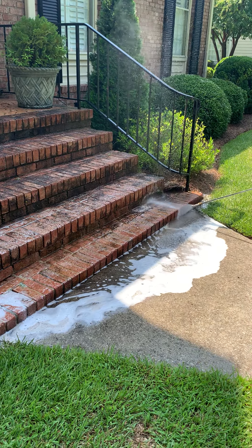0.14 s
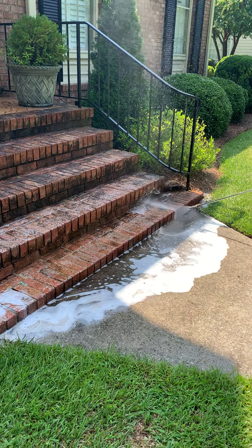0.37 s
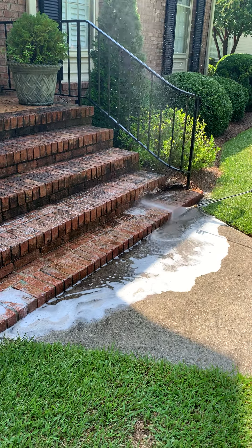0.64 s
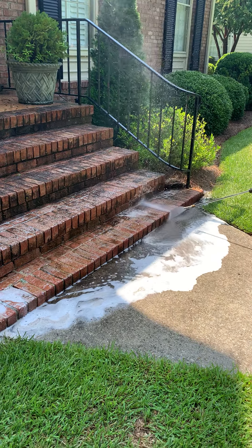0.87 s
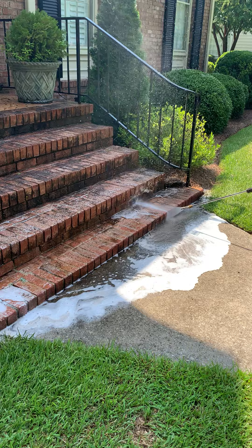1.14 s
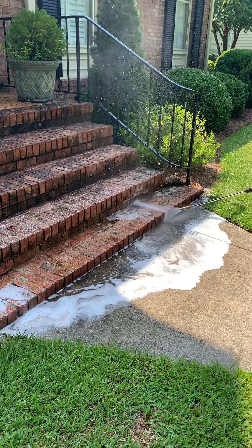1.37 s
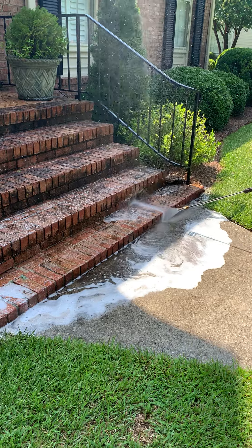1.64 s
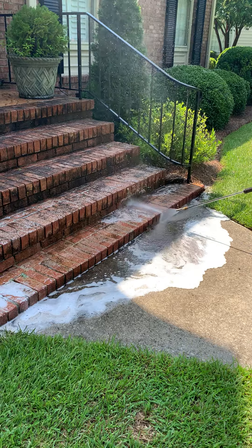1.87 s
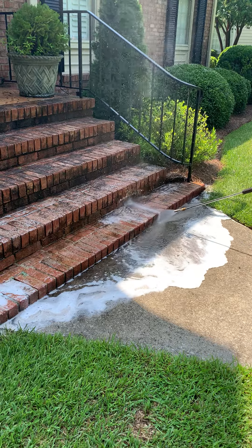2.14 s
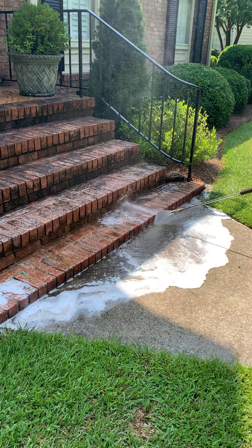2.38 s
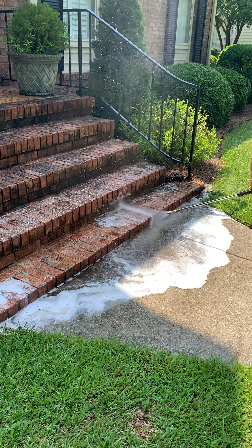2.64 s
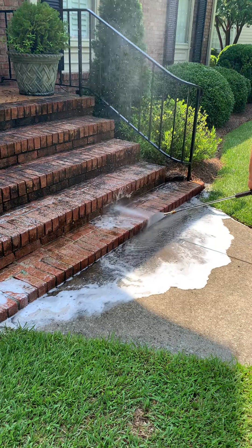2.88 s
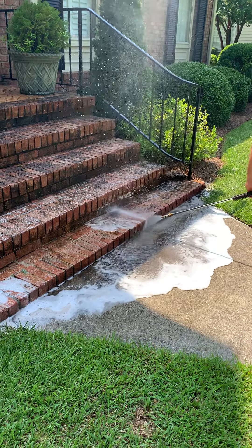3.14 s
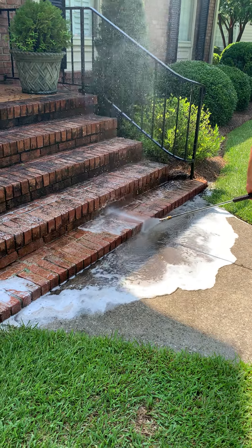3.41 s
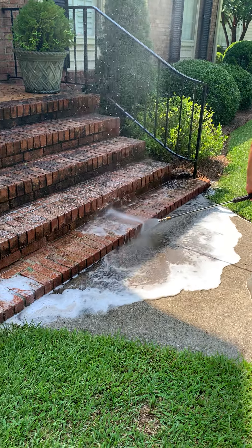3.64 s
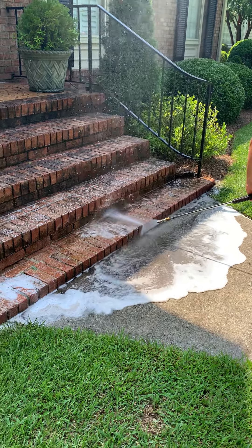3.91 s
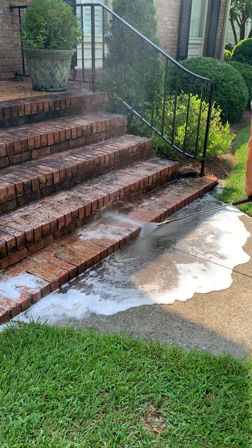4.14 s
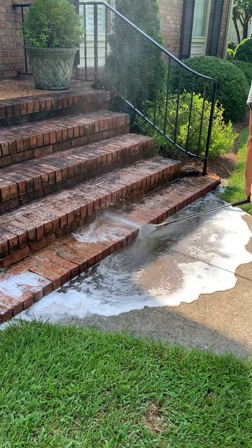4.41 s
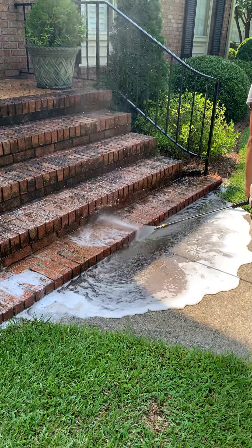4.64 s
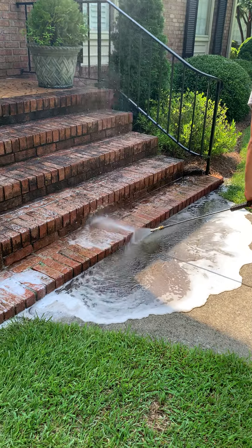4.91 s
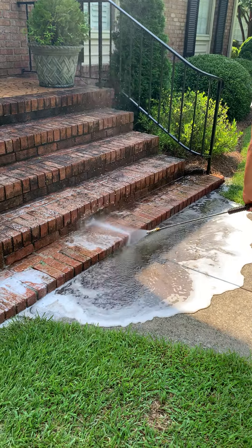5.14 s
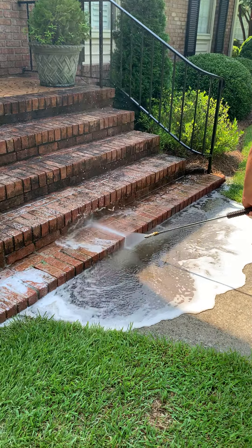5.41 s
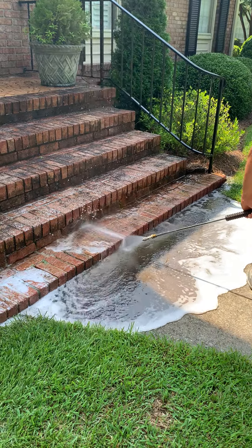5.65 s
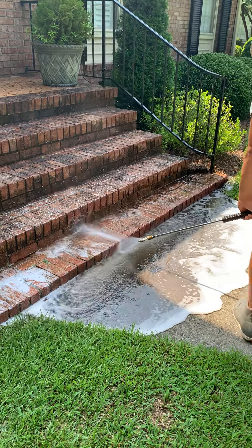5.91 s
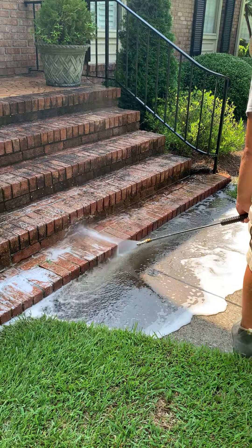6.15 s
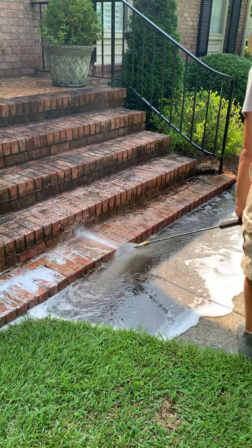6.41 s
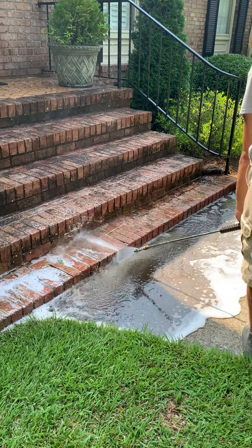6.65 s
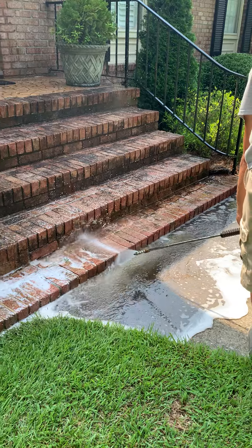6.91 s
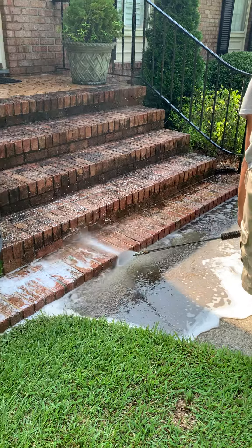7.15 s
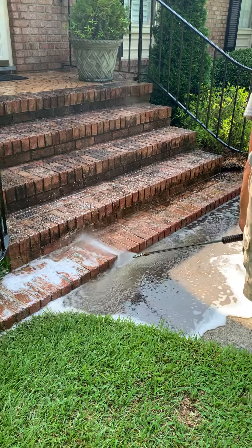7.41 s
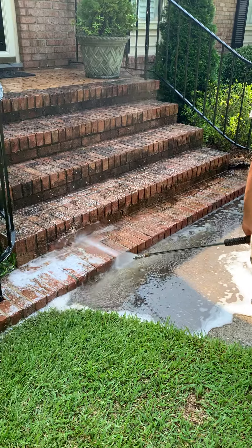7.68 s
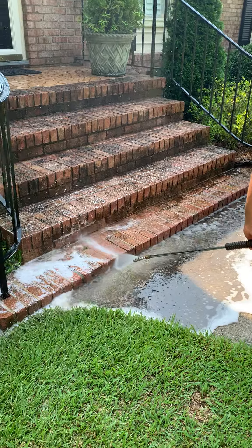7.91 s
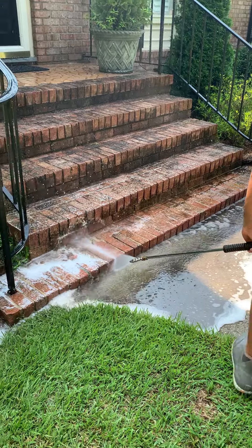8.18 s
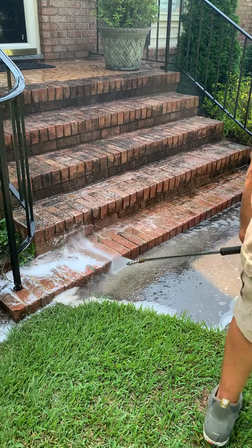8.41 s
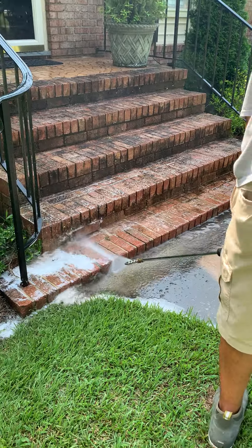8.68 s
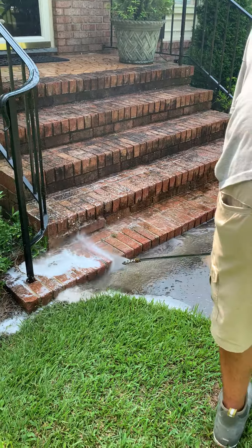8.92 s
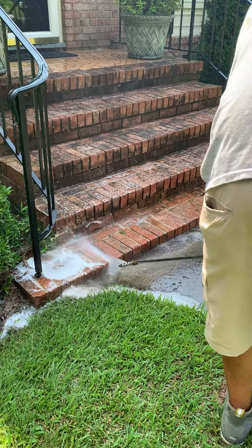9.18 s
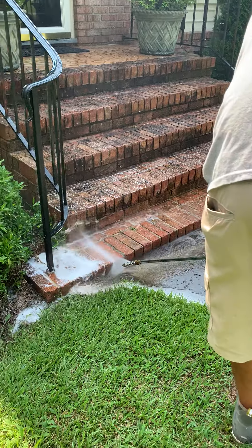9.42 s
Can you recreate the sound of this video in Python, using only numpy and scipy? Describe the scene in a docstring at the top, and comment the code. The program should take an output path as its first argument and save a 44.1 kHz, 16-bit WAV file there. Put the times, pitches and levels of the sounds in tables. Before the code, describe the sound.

A pressure washer's bright, hissing water jet scours brick steps outdoors, swelling and roughening in quick irregular pulses over a faint engine hum.

```python
"""A pressure washer's fan jet moves slowly along a brick step, heard from a phone a few metres away.
The jet is six layers of filtered, roughened noise: low rush, splash, spatter, scour, hiss and mist.
Scour and splash swell at mortar joints; ground and step faces add delayed copies.
Behind it: a petrol engine's hum (sines at multiples of the firing rate), wind rumble with short puffs,
and scattered spray (noise in opposite polarity at the two microphones)."""
import sys
import numpy as np
from scipy import signal
from scipy.fft import rfft, irfft, next_fast_len
from scipy.io import wavfile
from scipy.ndimage import uniform_filter1d, map_coordinates

SR = 44100
rng = np.random.default_rng(int(sys.argv[2]) if len(sys.argv) > 2 else 0)


def bounce(signal):
    """Save signal as a 16-bit WAV file at the path given by the first command-line argument."""
    frames = np.transpose(np.atleast_2d(signal))
    limited = np.clip(frames, -1, 1)
    pcm = np.round(limited * 32767).astype(np.int16)
    wavfile.write(sys.argv[1], SR, pcm)


def natural_amplitude(level_db):
    """Convert a level in decibels to a linear amplitude factor, elementwise."""
    exponent = np.asarray(level_db, float) / 20
    return 10 ** exponent


N = 421155
TIME = np.arange(N) / SR  # s

# Scattered spray spectrum: (frequency [Hz], relative level [dB])
YARD_SPECTRUM = [(150, -120), (250, -7), (400, 4), (550, -1.5), (950, 7), (1400, 2), (3000, 12),
                 (6000, -33), (9000, 13.5), (16000, -11)]

# Wind rumble level: (time [s], level [dB])
WIND_LEVEL = [(0, -50.5), (1.6, -53), (2.6, -59), (3.9, -54), (5.3, -61), (6.5, -58), (8, -55),
              (8.7, -54.5), (9.55, -55)]
# Shared wind rumble spectrum: (frequency [Hz], relative level [dB])
WIND_SPECTRUM = [(15, -120), (30, -17), (55, -2), (90, -0.5), (150, -5.5), (230, -7.5), (330, -120)]
# Spectrum of the eddies at each microphone alone: (frequency [Hz], relative level [dB])
EDDY_SPECTRUM = [(15, -120), (30, -8), (50, 0), (90, -3), (150, -10), (230, -16), (330, -120)]
# Size of those eddies: (time [s], ratio to the shared rumble [1])
EDDY_RATIO = [(0, 0.92), (3, 1.1), (3.6, .5), (4.4, 1.2), (5.4, 0.47), (8.4, 0.35), (9.1, .05)]
# Wind puffs: (time [s], level [dB], left over right [dB])
PUFFS = [(0.319, -29.5, 1.0), (0.414, -35, 1.6), (0.514, -36.8, 1), (0.599, -29, 0), (1.417, -37, 1.4),
         (1.55, -31, 0.8), (2.065, -34, 2), (2.81, -41, 3), (3.192, -35, 1.9), (6.755, -42, 4),
         (6.949, -40, -1), (7.184, -38, 2), (7.787, -41, 1), (7.841, -40, 3), (8.419, -33, 4)]

FIRING_HZ = 25.27
# Engine orders: (multiple of the firing rate [1], relative level [dB])
ENGINE_ORDERS = [(2, 3.5), (3, -6.5), (4, -10), (5, -7.5), (6, -13.5), (7, -13.5), (8, -16.5)]
# Engine level: (time [s], level [dB])
ENGINE_LEVEL = [(0, -49), (3, -48.5), (3.8, -52.5), (6, -53), (7.5, -53), (9.6, -56.5)]

# Jet spectra, each: (frequency [Hz], relative level [dB])
RUSH_SPECTRUM = [(100, -120), (150, -17), (210, -14), (270, -6), (360, -1.5), (450, 0.5), (560, -12.5),
                 (800, -120)]
SPLASH_SPECTRUM = [(380, -120), (560, -6), (700, -8), (900, -2.5), (1010, 1), (1120, -8.5), (1300, -1),
                   (1800, -120)]
SPATTER_SPECTRUM = [(900, -120), (1150, -26), (1330, 0.5), (1500, 2.5), (2100, -0.5), (2450, -0.5),
                    (2800, -1.5), (3500, -3), (3870, -2.5), (4500, -3.5), (6000, -120)]
SCOUR_SPECTRUM = [(2500, -120), (3870, -11.5), (4500, -8), (5500, -12), (7000, -5.5), (7900, -2.5),
                  (8500, 0.5), (9600, -10.5), (12000, -27), (17000, -44)]
HISS_SPECTRUM = [(3500, -120), (5000, -5), (8000, -7), (10000, 1.5), (12000, 1), (13500, -5),
                 (17000, -33.5)]
MIST_SPECTRUM = [(8000, -120), (11000, -8), (13000, 1.5), (14500, 4.5), (17000, 5)]
# Splash and low rush: (time [s], splash level [dB], rush level [dB])
SPLASH_RUSH_LEVEL = [(0, -43.5, -45), (1.9, -42.5, -44.5), (4.3, -41.5, -43.5), (5.3, -42.5, -44.5),
                     (6.3, -42, -42.5), (7.3, -42.5, -45), (8.5, -44.5, -47), (9.55, -46.5, -50.5)]
# Spatter level: (time [s], level [dB])
SPATTER_LEVEL = [(0, -39.5), (.45, -39.5), (1.05, -39.5), (2.4, -36), (3, -39), (3.4, -36), (4, -38.5),
                 (4.45, -37), (5.7, -39), (6.1, -37), (7.7, -37), (8.3, -38.5), (9.55, -38)]
# Scour level: (time [s], level [dB])
SCOUR_LEVEL = [(0, -29.5), (.75, -30), (1.4, -30.5), (2.8, -30.5), (3.3, -29), (3.9, -31), (4.4, -29),
               (5.3, -31.5), (6.2, -32.5), (6.9, -30), (8.3, -32.5), (9.55, -31.5)]
# Nozzle level, shared by hiss and mist: (time [s], level [dB])
NOZZLE_LEVEL = [(0, -29), (1.5, -28.5), (2.8, -27.5), (3.2, -27), (4.7, -26), (5.05, -26.5), (5.2, -28),
                (6.1, -27.5), (6.9, -25.5), (8.2, -26.5), (9.1, -26), (9.55, -26.5)]
# Brief treble dips: (time [s], depth [dB], length [ms])
TREBLE_DIPS = [(.21, 4, 37), (1.58, 3.5, 50), (2.37, 1.5, 50), (6.19, 2, 42), (7.63, 2, 34), (7.87, 2, 20),
               (8.87, -0.5, 60), (9.4, 2, 70)]
# Jet crossing a mortar joint or hollow; each layer takes its own share of a swell:
# (time [s], scour swell [dB], length [ms], splash swell [dB])
JOINTS = [(0.155, 3, 18, -3), (0.254, 4, 21, 3.5), (0.469, 5, 30, 6), (0.64, 2, 100, 7.5),
          (0.783, 7.5, 70, 10.5), (1.162, 3, 32, 4.5), (1.257, 1, 27, 3), (1.626, 5.5, 60, 5),
          (1.741, 4, 25, -1), (1.995, 2, 130, 3), (2.395, 5.5, 75, 3), (2.679, 6.5, 42, 5.5),
          (3.003, 5, 30, 4), (3.093, 3, 17, 3), (3.307, 5, 51, 3), (3.612, 5.5, 34, 1.3),
          (3.961, 6, 33, 5.5), (4.28, 4, 80, 5), (4.629, 7.5, 42, 7), (4.909, 7, 38, 4.5),
          (5.183, 6.5, 26, 2), (5.502, 5, 60, 4.5), (5.902, 7, 44, 6.5), (6.001, 5, 30, -0.5),
          (6.251, 8, 49, 3), (6.52, 4, 41, 1.5), (6.924, 3.9, 120, 2), (7.259, 3.5, 73, 1.8),
          (7.598, 3, 54, 3.5), (7.917, 7, 46, 3), (8.226, 7, 38, 1.5), (8.486, 4, 37, 3),
          (8.85, 4.5, 92, 5.5), (9.159, 7.5, 21, 1.5), (9.454, 6, 39, 4.5)]
# Low dip that drifts mostly upward: (time [s], centre [Hz], gain at centre [dB])
HOLLOW = [(0, 507, -4), (3, 545, -5), (5, 580, -7), (7, 585, -8), (9.6, 580, -9)]
# Step and ground reflections, strengths relative to one another, negative = inverted:
# (extra path at first [ms], at last [ms], strength at first [1], midway [1], at last [1])
FACES = [(1.395, 1.3, .06, .17, .14), (1.17, 1.02, .12, .26, -.12), (.946, .92, .12, .16, .14),
         (1.72, 1.62, .08, .11, .02), (1.81, 1.79, -.01, -.08, -.09), (.855, .775, .15, .06, -.05)]

# Phase lead of left over right: (frequency [Hz], early lead [rad], late lead [rad])
LEAD = [(0, 0, 0), (200, 0, 0), (330, -.3, -.3), (580, 0, 0), (1000, -.5, -.4), (1250, -.2, -.15),
        (1550, -.17, -.1), (1780, 0, 0), (2000, .2, .6), (2350, 1.3, 1.5), (2800, 0, .15), (3050, .3, 0),
        (3300, 1.4, .4), (3800, 1.9, 1.6), (4200, 2.45, 2.1), (4700, 3.14, 3.14), (6700, 6.28, 6.28),
        (22050, 28.6, 28.6)]
# Added lead of left over right in the bass: (time [s], lead [ms])
BASS_LEAD = [(0, 1.4), (.6, 2.5), (2.2, 2.4), (2.6, 1.2), (3.4, .2), (5, 0)]
LOW_HZ, TOP_HZ = 42, 15730  # microphone roll-off, band limit


def unit(x):
    """Scales to rms 1."""
    return x / np.sqrt(np.mean(x ** 2) + 1e-20)


def curves(rows, t=TIME):
    """Interpolates each column after the first at t."""
    knots, *columns = np.transpose(rows)
    return [np.interp(t, knots, column) for column in columns]


def wobble(knots_per_s):
    """Smooth random curve: a spline through Gaussian knots."""
    knots = rng.standard_normal(int(N * knots_per_s / SR) + 4)
    return map_coordinates(knots, [TIME * knots_per_s])


def bumps(centre_s, width_ms, height_db):
    """Sum of Gaussian bells in dB; width is at half height."""
    coarse_s = TIME[::64]
    offset = (coarse_s[:, None] - centre_s) / (width_ms / 1000)
    bells = np.exp(-4 * np.log(2) * offset ** 2)
    return np.interp(TIME, coarse_s, bells @ height_db)


def coloured(x, spectrum):
    """Filters x by a spectrum joined on a log-frequency axis, then scales to rms 1."""
    size = next_fast_len(N + 8192)
    hz, db = np.transpose(spectrum)
    bins_hz = np.fft.rfftfreq(size, 1 / SR)
    gain = natural_amplitude(np.interp(np.log(bins_hz + 1), np.log(hz), db))
    return unit(irfft(rfft(x, size) * gain, size)[:N])


def yard():
    """Spray scattered by house and hedges: one noise, opposite in polarity at the two microphones."""
    polarity = np.array([[1], [-1]])
    return natural_amplitude(-47.5) * polarity * coloured(rng.standard_normal(N), YARD_SPECTRUM)


def wind_rumble():
    """Lumpy low noise shared by both microphones, plus independent eddies at each."""
    spectra = (WIND_SPECTRUM, EDDY_SPECTRUM, EDDY_SPECTRUM)
    shared, left, right = [coloured(rng.standard_normal(N), spectrum) for spectrum in spectra]
    eddies = np.abs(curves(EDDY_RATIO)[0]) * np.array([left, right])
    air = unit(shared + eddies)
    lumps = natural_amplitude(2.2 * wobble(7) + 2.2 * wobble(20))
    return unit(air * lumps) * natural_amplitude(curves(WIND_LEVEL)[0])


def wind_puffs():
    """Soft pushes and rebounds: a gliding tone about 65 Hz and its octave under a short bell."""
    half = 2000  # samples
    puffs = np.zeros((2, N + SR))
    u = np.arange(-half, half) / SR  # s from the puff's centre
    for (time_s, db, pan_db), chance in zip(PUFFS, rng.random((len(PUFFS), 2))):
        glide = 1500 * u * u * (chance[0] - .5)
        swing = 2 * np.pi * (65 * u + glide + chance[1])
        push = np.exp(-(u / 0.0078) ** 2) * (np.sin(swing) + .5 * np.sin(2.0 * swing))
        gains = natural_amplitude([db + pan_db / 2, db - pan_db / 2])
        start = round(time_s * SR)
        puffs[:, start:start + 2 * half] += np.outer(gains, push)
    return puffs[:, half:][:, :N]


def engine():
    """Orders of a one-cylinder engine at governed speed; pitch and each order's level waver."""
    turn = 2 * np.pi * np.cumsum(FIRING_HZ * (1 + 0.0018 * wobble(2.25))) / SR
    hum = np.zeros(N)
    for order, db in ENGINE_ORDERS:
        waver_db = (-0.5 + 0.44 * order) * wobble(4) + 1.4 * wobble(12)
        hum += natural_amplitude(db + waver_db) * np.sin(order * turn + 2 * np.pi * rng.random())
    return natural_amplitude(curves(ENGINE_LEVEL)[0]) * np.sqrt(2) * hum


def water(spectrum, patchy_db, gritty_db, drops):
    """Turbulent noise: time-frequency gain patches, millisecond roughness, cracks of single drops."""
    z = signal.stft(rng.standard_normal(N), nperseg=512)[2]
    field = uniform_filter1d(rng.standard_normal(z.shape), size=8, axis=0)
    field = uniform_filter1d(field, size=8, axis=1)
    noise = signal.istft(z * natural_amplitude(patchy_db * unit(field)), nperseg=512)[1][:N]
    rough = unit(noise * natural_amplitude(gritty_db * wobble(500)))
    chance, size = rng.random(N), rng.standard_normal(N)
    cracks = (chance < 900 / SR) * size  # 900 drops/s on average
    return coloured(rough + drops * unit(cracks), spectrum)


def joint_swells():
    """Scour and splash swells in dB as the jet crosses each joint."""
    time_s, scour_db, length_ms, splash_db = np.transpose(JOINTS)
    return bumps(time_s, length_ms, scour_db), bumps(time_s, length_ms, splash_db)


def nozzle_db():
    """Level shared by hiss and mist: slow curve, brief dips and flicker."""
    time_s, depth_db, length_ms = np.transpose(TREBLE_DIPS)
    return curves(NOZZLE_LEVEL)[0] - bumps(time_s, length_ms, depth_db) + 0.84 * wobble(24)


def rush():
    """Low rush of water: steady noise on a slow level curve."""
    level_db = curves(SPLASH_RUSH_LEVEL)[1]
    return natural_amplitude(level_db) * water(RUSH_SPECTRUM, patchy_db=0.27, gritty_db=0.0, drops=0.055)


def splash(splash_up_db, surge):
    """Splashing water: patchy mid-band noise that follows the joints slightly."""
    level_db = curves(SPLASH_RUSH_LEVEL)[0] + 0.2 * splash_up_db + 0.24 * surge
    return natural_amplitude(level_db) * water(SPLASH_SPECTRUM, patchy_db=1.2, gritty_db=-1.8, drops=0.14)


def spatter(splash_up_db, surge):
    """Spray splashing back: rough noise that swells at the joints."""
    level_db = curves(SPATTER_LEVEL)[0] + 0.83 * splash_up_db + 0.5 * surge
    return natural_amplitude(level_db) * water(SPATTER_SPECTRUM, patchy_db=0.97, gritty_db=-1.46, drops=0.14)


def scour(scour_up_db, surge):
    """Water scouring brick: bright noise rich in drop cracks, swelling at the joints."""
    level_db = curves(SCOUR_LEVEL)[0] + 1.05 * scour_up_db + 1.0 * surge
    return natural_amplitude(level_db) * water(SCOUR_SPECTRUM, patchy_db=0.36, gritty_db=1.0, drops=0.39)


def hiss(top_db, scour_up_db, surge):
    """Nozzle hiss: treble noise that rises a little with the scour."""
    level_db = top_db + 0.21 * scour_up_db + 0.72 * surge
    return natural_amplitude(level_db) * water(HISS_SPECTRUM, patchy_db=0.5, gritty_db=0.5, drops=0.075)


def mist(top_db, splash_up_db):
    """Fine mist: the highest noise, sinking as the splash rises, with its own flutter."""
    level_db = top_db + 2 - 0.34 * splash_up_db + 0.7 * wobble(30)
    return natural_amplitude(level_db) * water(MIST_SPECTRUM, patchy_db=-1.5, gritty_db=1.5, drops=0.12)


def reflected(x):
    """Direct sound, its low dip, and delayed copies off steps and ground; rough wet brick scatters treble."""
    hz, t, z = signal.stft(x, SR, nperseg=2048)
    along = t / t[-1]
    copies = 0
    for first_ms, last_ms, *strengths in FACES:
        path_ms = first_ms + (last_ms - first_ms) * along
        strength = np.interp(along, [0, .5, 1], strengths)
        copies = copies + strength * np.exp(-2j * np.pi * np.outer(hz, path_ms) / 1000)
    mirror = 1.2 / (1 + (hz / 8000) ** 4)
    dip_hz, dip_db = curves(HOLLOW, t)
    dip = natural_amplitude(dip_db * np.exp(-((hz[:, None] - dip_hz) / 45) ** 2))
    return signal.istft(z * dip * (1 + mirror[:, None] * copies), SR, nperseg=2048)[1][:N]


def jet():
    """Six water layers; hand tremor and pump surges move all but rush and mist together."""
    scour_up_db, splash_up_db = joint_swells()
    surge = .5 * wobble(18) + 0.98 * wobble(60)
    top_db = nozzle_db()
    low = rush() + splash(splash_up_db, surge) + spatter(splash_up_db, surge)
    high = scour(scour_up_db, surge) + hiss(top_db, scour_up_db, surge) + mist(top_db, splash_up_db)
    return reflected(low + high)


def scene():
    """Stereo sum; jet and engine reach both microphones alike."""
    return yard() + wind_rumble() + wind_puffs() + engine() + jet()


def band_limit(x):
    """A steep low-pass at the top of the band."""
    return signal.sosfilt(signal.butter(12, 17090, fs=SR, output="sos"), x)


def record(dry):
    """Phone stereo: a phase lead split between the channels, low roll-off and top band limit."""
    hz, t, z = signal.stft(dry, SR, nperseg=2048, noverlap=1536)
    early_rad, late_rad = curves(LEAD, hz)
    pan = np.clip((t - 1.5) / 8.5, 0, 1)  # the phone turns to follow the jet
    bass_hz = np.clip((290 - hz) / 80, 0, 1) * hz  # fades out from 210 to 290 Hz
    bass_rad = 2 * np.pi * np.outer(bass_hz, curves(BASS_LEAD, t)[0]) / 1000
    lead_rad = np.outer(early_rad, 1 - pan) + np.outer(late_rad, pan) + bass_rad
    band = (hz < TOP_HZ) * hz ** 3 / np.sqrt(hz ** 6 + LOW_HZ ** 6)
    z = z * np.exp(.5j * np.array([lead_rad, -lead_rad])) * band[:, None]
    stereo = signal.istft(z, SR, nperseg=2048, noverlap=1536)[1][:, :N]
    return band_limit(stereo)


dry = scene()
out = record(dry)
bounce(out)
```